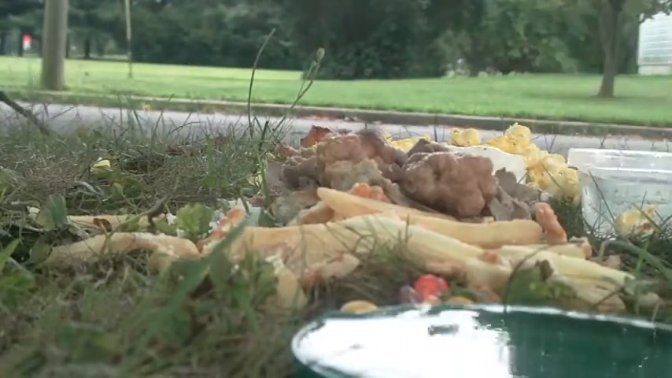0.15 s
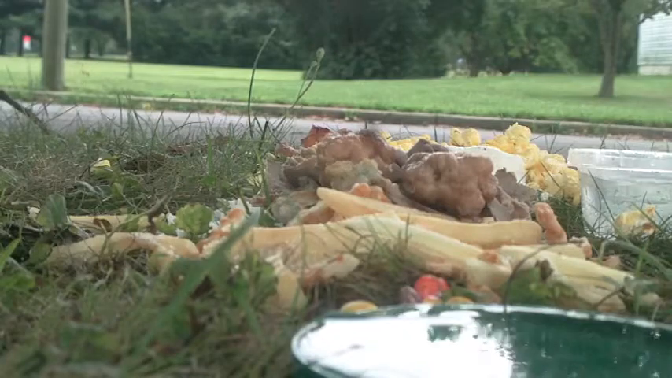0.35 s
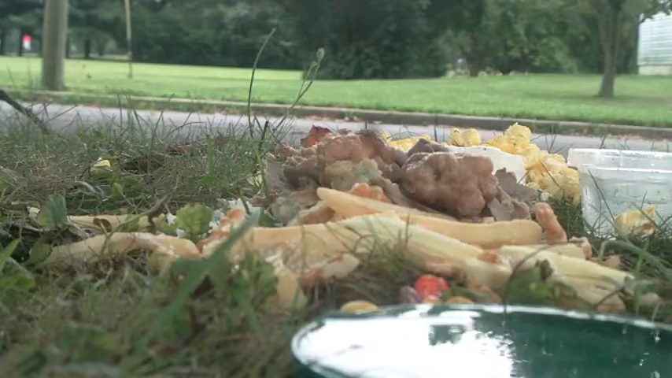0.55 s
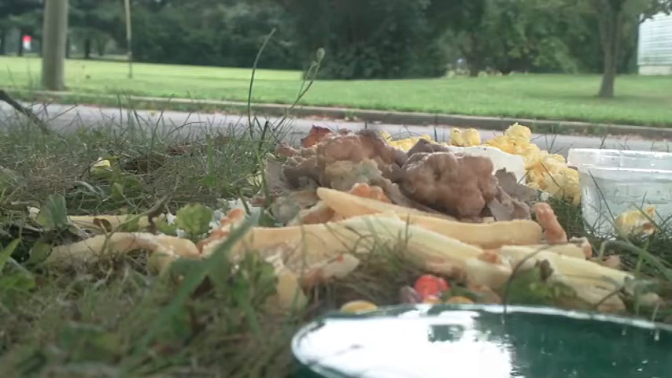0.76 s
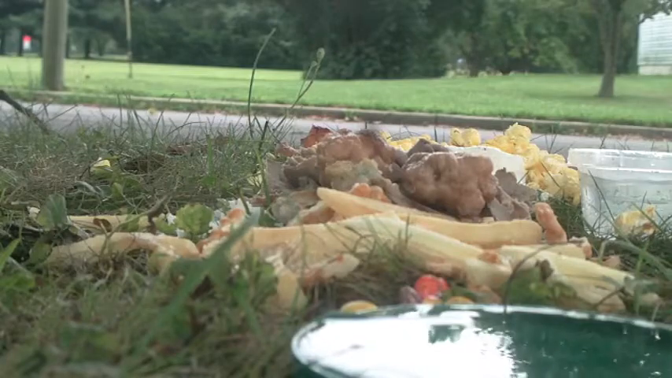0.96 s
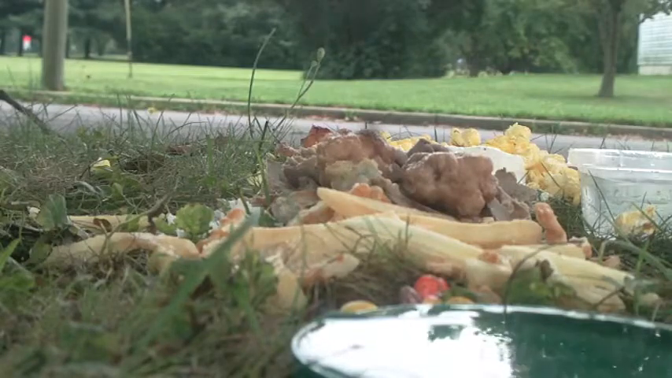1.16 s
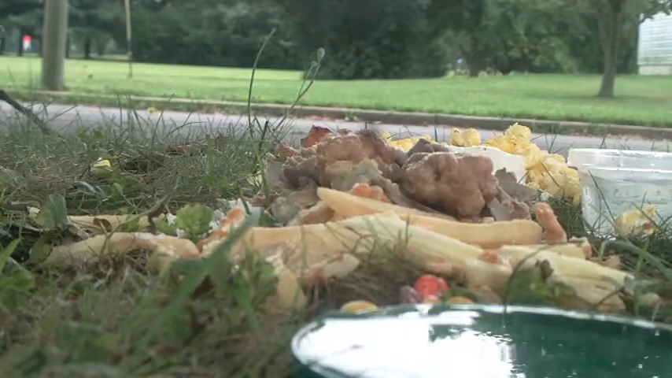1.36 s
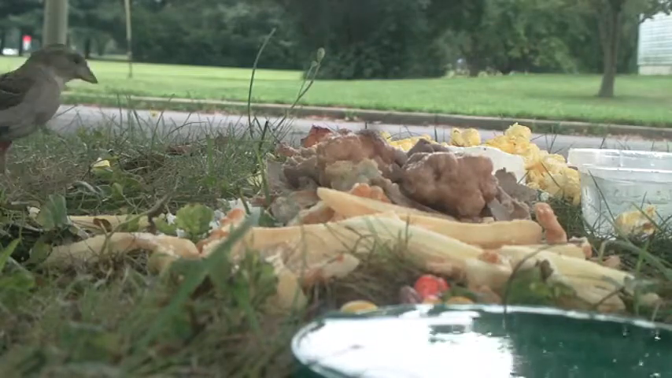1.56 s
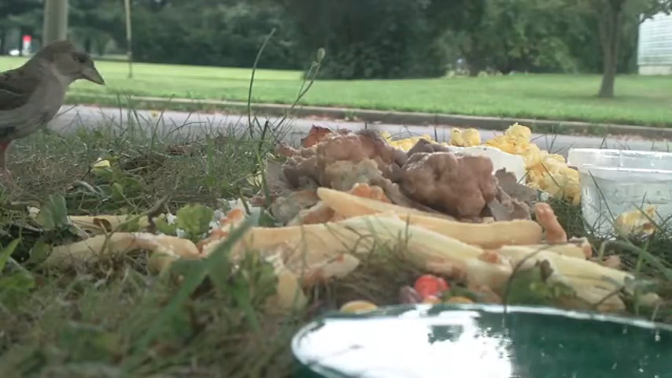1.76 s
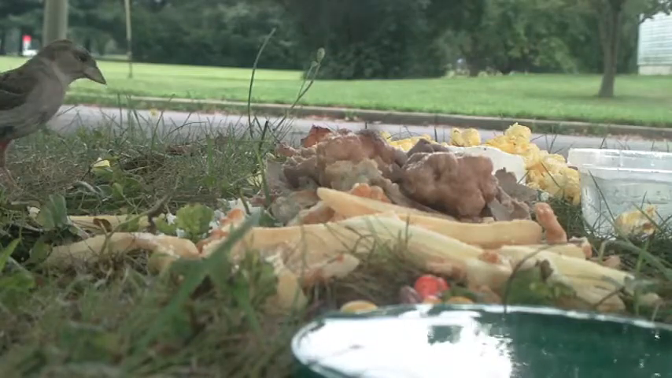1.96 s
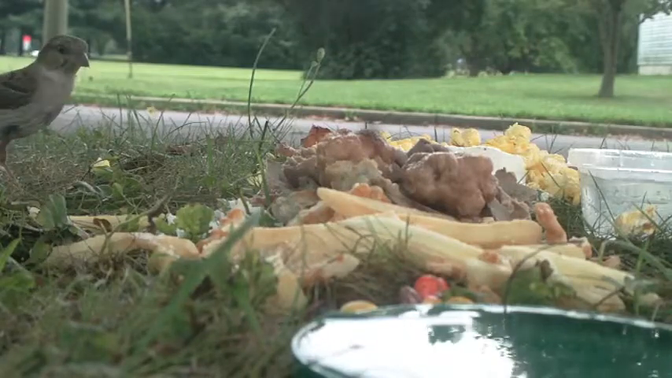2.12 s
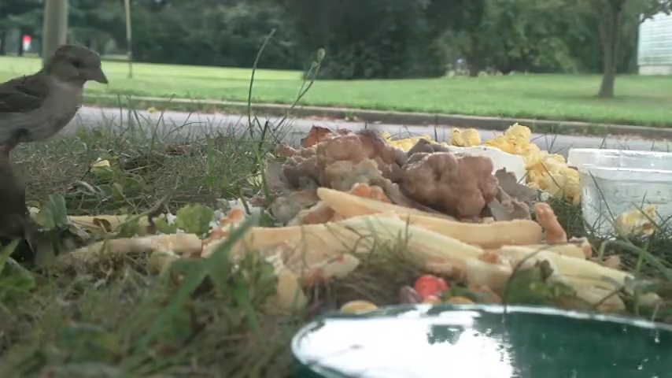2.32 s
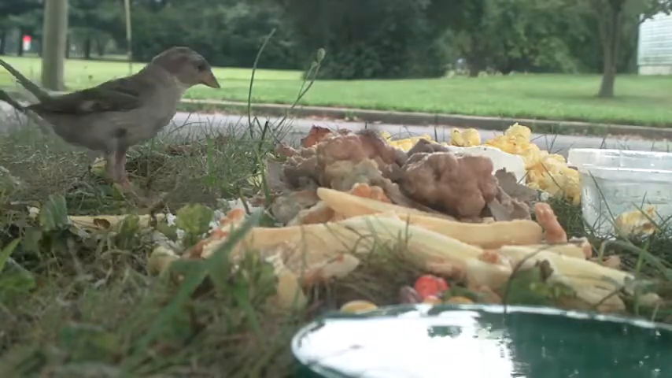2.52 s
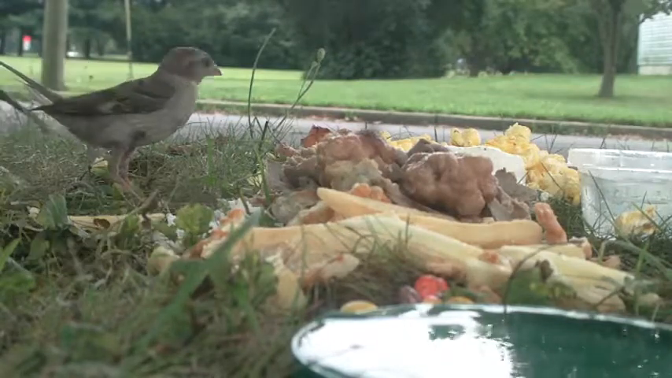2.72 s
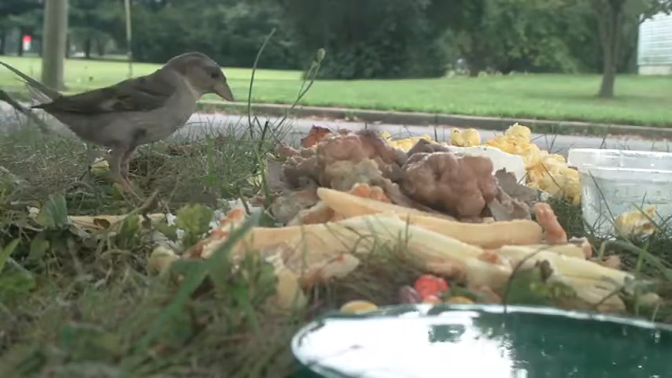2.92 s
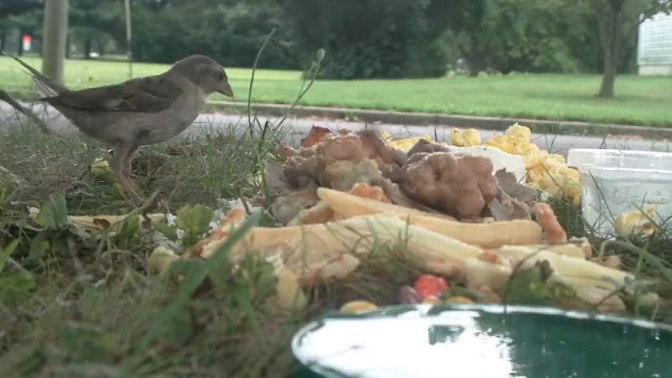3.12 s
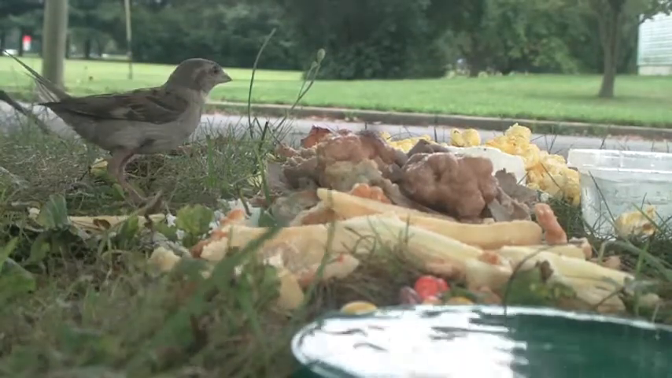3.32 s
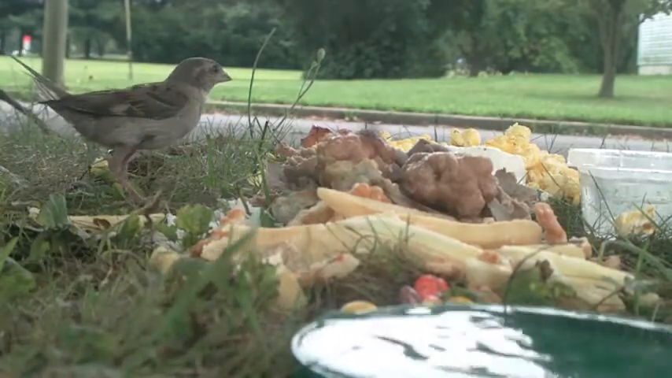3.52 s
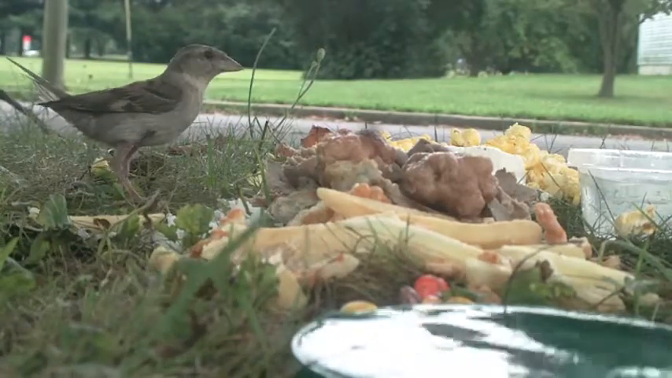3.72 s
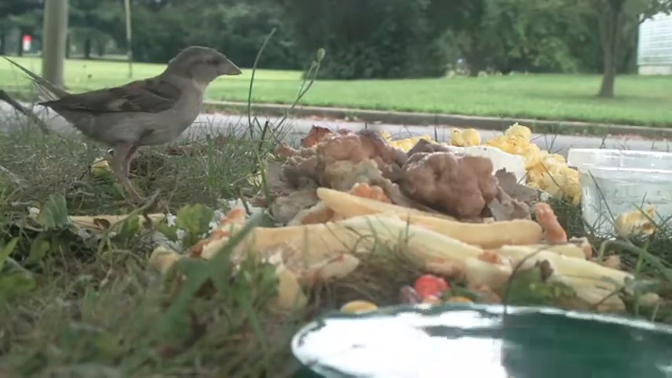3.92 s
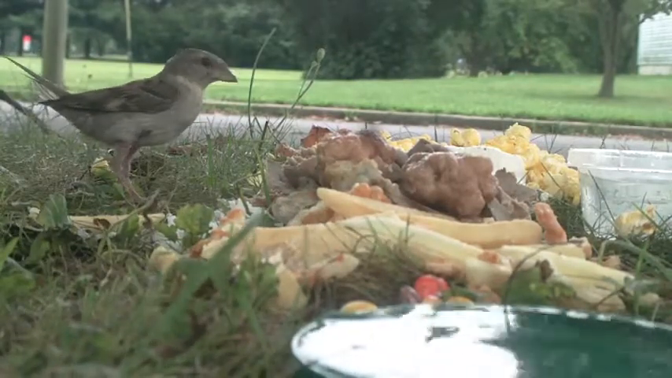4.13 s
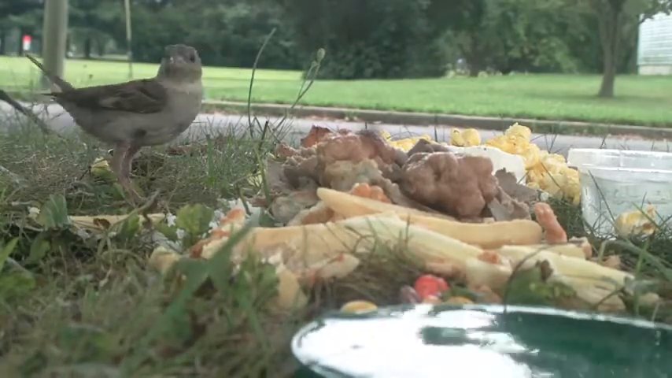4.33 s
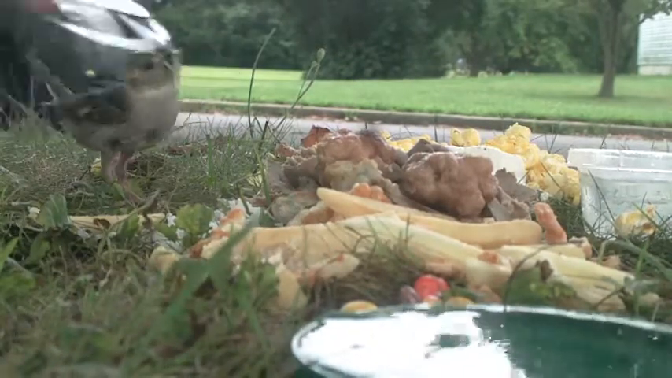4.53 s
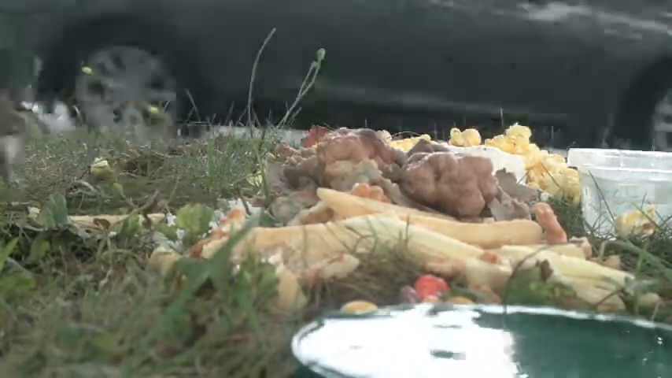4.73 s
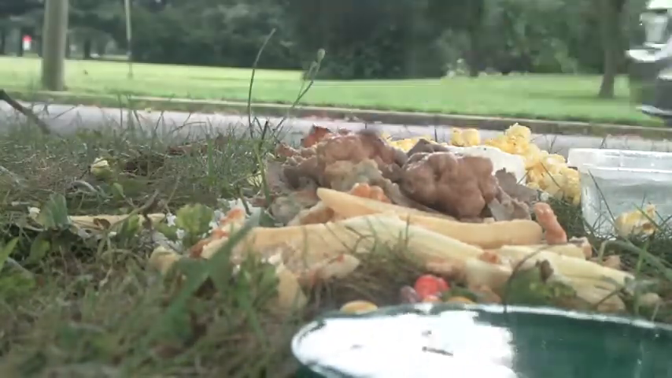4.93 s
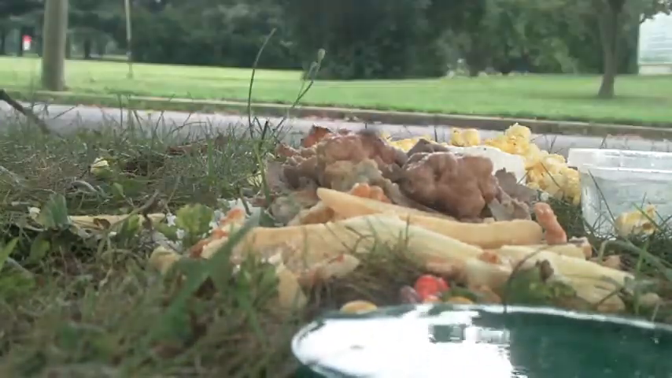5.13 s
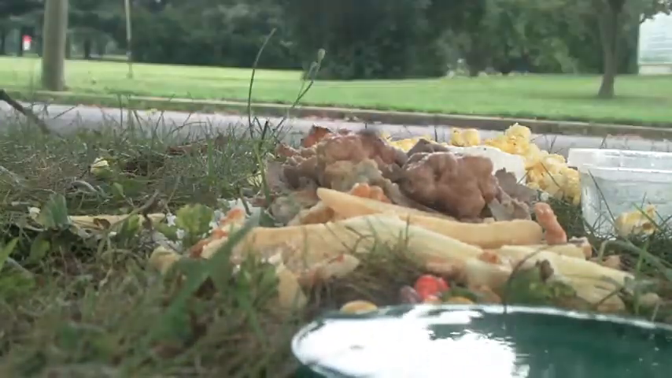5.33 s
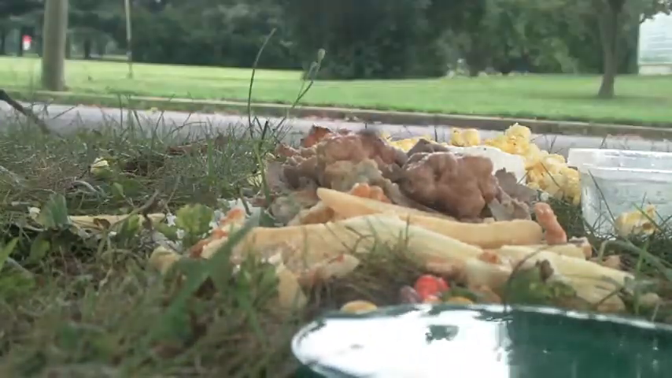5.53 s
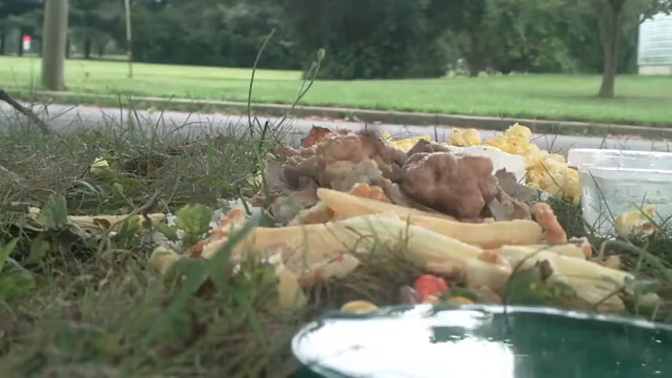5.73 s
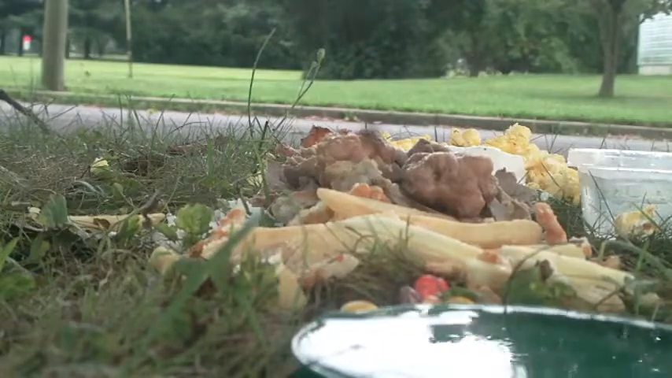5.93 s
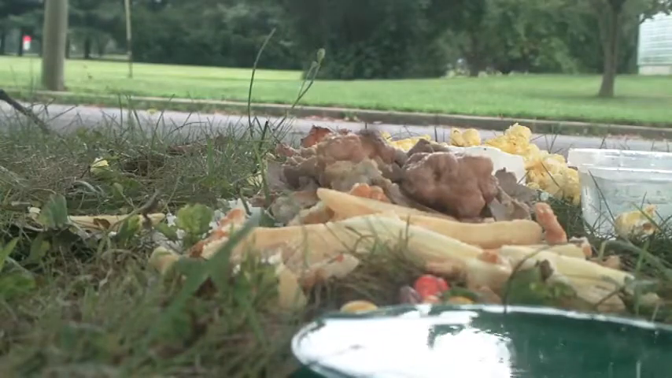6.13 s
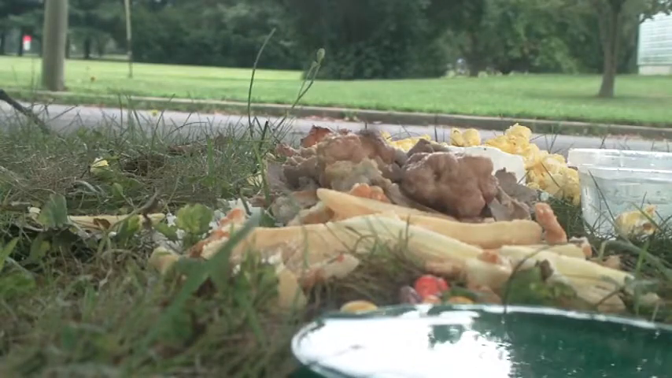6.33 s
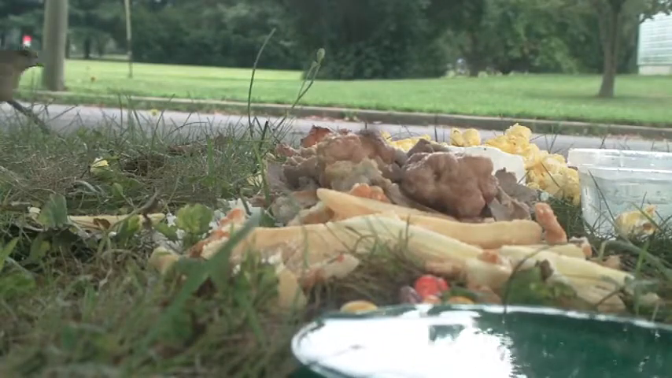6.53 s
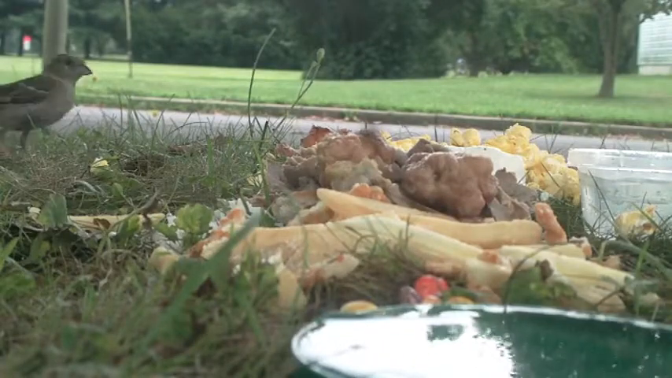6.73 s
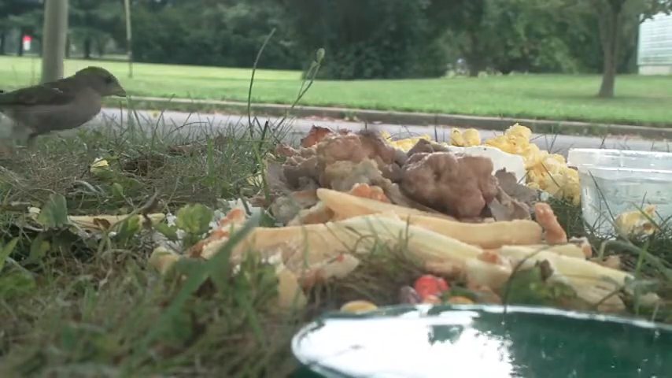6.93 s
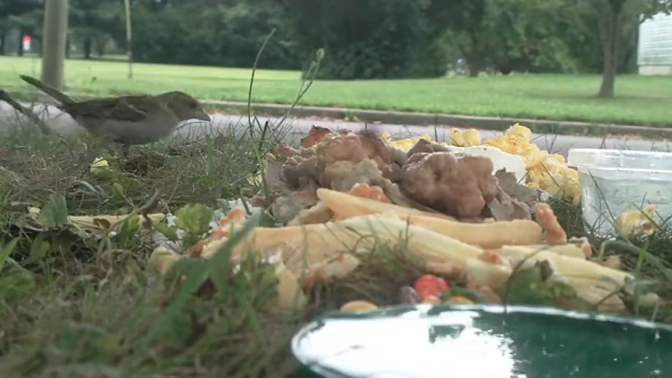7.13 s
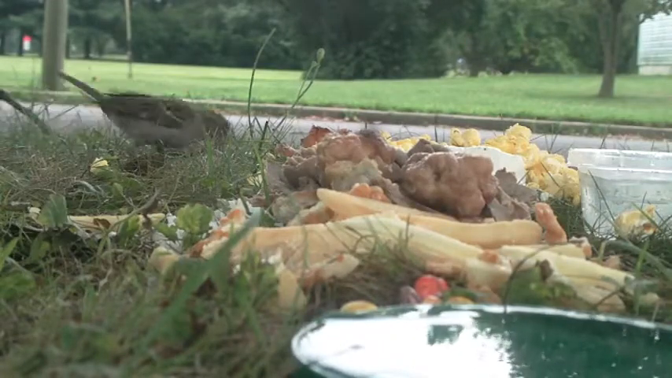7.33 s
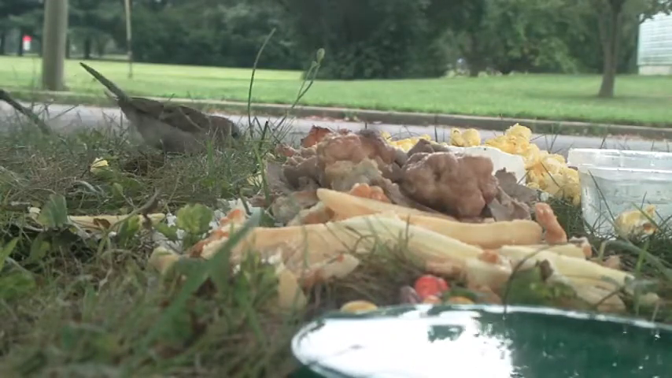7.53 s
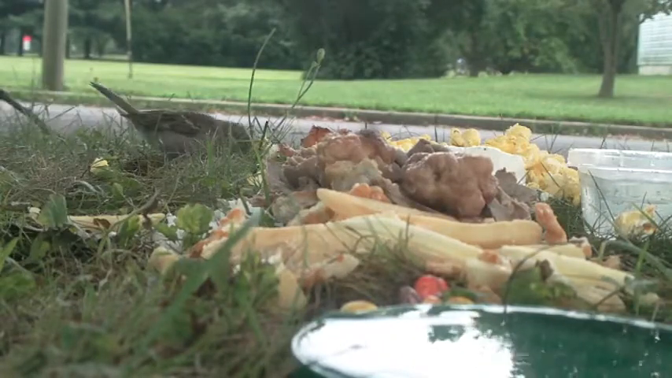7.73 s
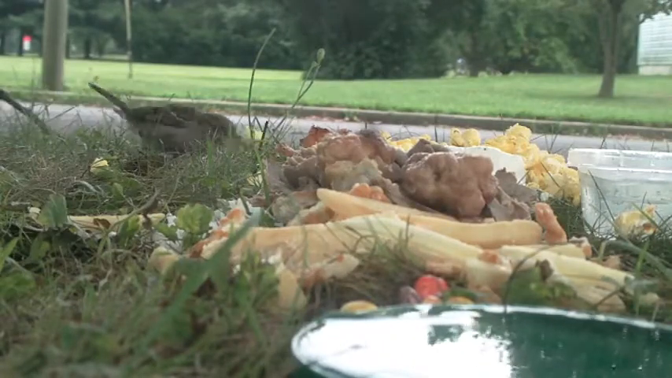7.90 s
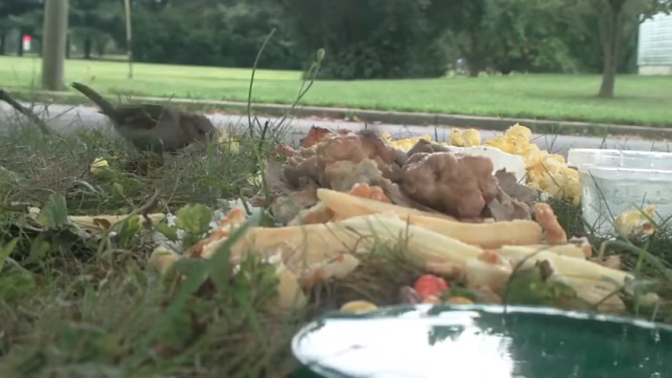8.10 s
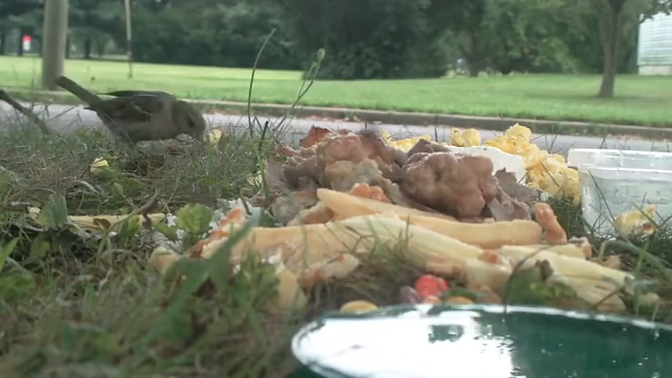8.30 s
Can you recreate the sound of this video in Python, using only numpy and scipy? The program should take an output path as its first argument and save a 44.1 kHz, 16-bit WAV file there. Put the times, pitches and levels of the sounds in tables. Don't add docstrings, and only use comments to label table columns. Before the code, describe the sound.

Distant town rumble, heavy wind buffeting, and a close car pass with tyre roar and wheel thuds, then abruptly quieter as another vehicle approaches.

```python
import sys
import numpy as np
from scipy import signal
from scipy.fft import rfft, irfft, next_fast_len
from scipy.io import wavfile
from scipy.ndimage import uniform_filter1d, map_coordinates

SR = 44100
rng = np.random.default_rng(int(sys.argv[2]) if len(sys.argv) > 2 else 0)


def volts(x):
    e = np.asarray(x, float) / 20
    return 10 ** e


def generate_wav(sig):
    pcm = np.round(np.clip(np.atleast_2d(sig).T, -1, 1) * 32767).astype(np.int16)
    wavfile.write(sys.argv[1], SR, pcm)


N = 368676
T = np.arange(N) / SR

SPLIT_HZ = [380, 1400, 7800]
# frequency in Hz, level in dB per Hz.
NEAR_TYRES = [(44, -23), (75, 1), (152, -6), (254, -1.5), (310, -7), (378, -10.5), (505, -10), (616, -14.5),
              (769, -13), (1030, -12.5), (2090, -31.5), (6900, -47), (7890, -41), (8620, -45.5),
              (15000, -51)]
# frequency in Hz, level in dB per Hz.
FAR_TYRES = [(44, 1.5), (75, 9.5), (140, 1.5), (190, 1), (222, -4), (284, -3), (331, -10.5), (378, -11),
             (859, -15.5), (939, -14.5), (1750, -14), (3630, -27.5), (6900, -35.5), (7890, -28),
             (15000, -42)]
# frequency in Hz, likeness from -1 to 1.
TYRES_ALIKE = [(60, 1), (130, 0.99), (290, 1), (640, 0.97), (1410, 0.94), (3100, 0.79), (6820, 0.49),
               (15000, -0.48)]
# level alongside in dB, gain along the road in dB, gain behind the
# car in dB, loss over grass in dB per metre, level of other traffic in dB.
RANGES = [
    (-19, -3.5, -1.5, 0.2, -37),
    (-21, -2.5, -0.5, 0.2, -54),
    (-32.5, 7, 0, 0, -60.5),
    (-42.5, -1.5, 3.5, -0.26, -62),
]
NEXT_CAR_DB = [4, 3.5, -2, -6]
# frequency in Hz, level in dB per Hz.
GROUND = [(15, -20), (28, -7), (42, 10), (55, -2), (75, -39.5)]
# time in seconds, frequency in Hz.
FIRING = [
    (4.5, 60.6),
    (4.68, 62.5),
    (4.95, 68.15),
    (5.62, 71.64),
    (6.06, 72.3),
    (6.37, 70.3),
]
# time in seconds, length in seconds, rise in dB.
LURCH = (4.36, 0.049, 24)
# start in seconds, frequency in Hz, level in dB.
IDLING = (5.62, 56.2, -32)
# time in seconds, length in seconds, rise in dB.
JOLTS = [
    (4.68, .04, 7),
    (4.79, .06, 10),
    (4.88, .03, 7.5),
    (5.054, .022, 22),
    (5.19, .03, 11),
    (5.35, .03, 13),
]
# time in seconds, frequency in Hz.
TREAD = [
    (3.85, 1128),
    (4.6, 1042),
    (5.9, 1040),
]
# time in seconds, length in seconds, rise in dB.
TREAD_ONSET = (3.92, 0.11, 5.7)
# time in seconds, slap level in dB, thud level in dB.
BUMPS = [
    (3.994, -10, -37),
    (4.333, -7, -15),
    (4.422, -5.5, -18),
    (4.488, -5, -6.5),
    (4.575, -11, -17),
    (4.705, 3, -31),
    (5.039, -7, -9.5),
    (5.733, -11, -16.5),
    (5.883, -10, -16),
    (6.221, -11.5, -36),
]
# time in seconds, strength in dB.
GUST = [
    (3.12, -42),
    (3.22, -18.5),
    (3.36, -6.5),
    (3.43, -0.5),
    (3.63, 0),
    (3.7, -6),
    (3.75, -10),
    (3.9, -16.5),
]
# frequency in Hz, level in dB per Hz.
HEAVE = [(12, -24), (25, 7), (40, 7.5), (70, 2), (120, -3), (250, -51)]
# frequency in Hz, level in dB per Hz.
FLUTTER = [(35, -36), (70, -2), (110, 6), (180, -3), (280, -4.5), (450, -15), (800, -31), (1600, -58)]
# frequency in Hz, level in dB per Hz.
WHISTLE = [(1500, -11), (3000, 5.5), (7000, -2), (10000, -8.5), (14000, 1), (16000, -13)]
# time in seconds, peak in dB, frequency in Hz.
THUMPS = [
    (3.256, -15, 46),
    (3.287, -7.5, 44.6),
    (3.346, -1, 42),
    (3.402, -1, 48),
    (3.464, -4, 34.7),
    (3.522, -6, 31.4),
    (3.581, -5.5, 50),
    (3.638, -10, 35.7),
    (3.669, -15, 38),
]
# time in seconds, length in seconds, rise in dB, left over right in dB.
FLAPS = [
    (3.432, 0.031, 22, 2),
    (3.49, 0.013, 9, -9),
    (3.53, .018, 17, 3.5),
    (3.588, 0.024, 18.5, -1.5),
    (3.624, 0.02, 12.5, 11),
]
# time in seconds, peak in dB, left over right in dB.
SPITS = [(3.2276, -40, 0.5), (3.265, -41, 4), (3.3084, -30.5, 0.5), (3.3487, -39, 3), (3.3694, -29, -3),
         (3.4014, -36, 1.0), (3.406, -22, -4), (3.4241, -30, 4), (3.4524, -37, -4.0), (3.4604, -23, 1),
         (3.481, -20.5, 3), (3.5104, -29, -1), (3.5204, -21.5, 2), (3.5464, -29, -2.5), (3.578, -20, -2),
         (3.6351, -30, -2), (3.7354, -33, -0.5), (3.7984, -36, -0.5)]
# time in seconds, peak in dB, left over right in dB.
TICKS = [
    (.6245, -38, -5),
    (.64, -39, 0),
    (.76, -46, 0),
    (1.3903, -34, 3),
    (2.5504, -46.5, 2),
    (2.5875, -36, 3),
    (3.188, -40, 0),
    (7.8835, -37, -1.5),
]
# time in seconds, peak in dB.
LENS_STEPS = [(0.2493, -60), (0.3701, -65.5), (0.5771, -56), (0.8734, -66), (1.2231, -63), (1.4794, -69),
              (1.6282, -61), (1.9754, -58.5), (2.3291, -65), (2.8294, -65), (7.3317, -66), (7.5423, -62),
              (7.7732, -62), (8.0237, -66), (8.2781, -57.5)]
# time in seconds, length in seconds, frequency in Hz, width in Hz, level in dB.
BIRDS = [
    (0.103, 0.15, 5310, 502, -59.5),
    (.55, .14, 6390, 300, -73),
    (0.895, 0.27, 6950, 700, -56.5),
    (1.7, .12, 6410, 300, -62),
    (1.962, 0.3, 6800, 600, -58),
]
# start in seconds, length in seconds, first Hz, last Hz, level in dB.
CHIRPS = [
    (1.198, 0.067, 2420, 2370, -46),
    (1.945, .055, 4500, 4100, -56),
]
# frequency in Hz, level in dB per Hz.
TOWN = [(13, -31), (22, 8.5), (53, 4.5), (107, -2), (153, -19), (201, -6), (328, -17.5), (615, -25),
        (1690, -36), (2840, -34), (6800, -32.5), (7790, -44), (8450, -40), (9430, -39), (15000, -50)]
# frequency in Hz, likeness from -1 to 1.
TOWN_ALIKE = [(60, 0.73), (130, 0.64), (290, 0.78), (640, -0.21), (1410, 1), (3100, 0.57), (6820, -0.084),
              (15000, -0.73)]
# start in seconds, end in seconds, frequency in Hz, first level in dB, last level in dB.
HUM = [
    (.3, 2.9, 192.7, -50.5, -44.5),
    (6.002, 8.36, 187.4, -43.5, -38.5),
]
# multiple of its frequency, level in dB, unsteadiness from 0 to 1.
HUM_ORDERS = [(0.248, 0, .04), (0.499, -3.5, 0.02), (0.641, -2.5, 0.02), (1, 0.5, 0), (1.8, -12, 0),
              (2, -11.5, 0), (2.31, -12.5, 0.02), (2.5, -9, 0.02)]
# frequency in Hz, width in Hz, level in dB.
NOTCH = (7880, 270, -19)

JUMP_S = 6.38
NEAREST_S, NEXT_NEAREST_S = 4.737, 10.91
SPEED_M_S = 11
KERB_M = 3.45
AXLE_M = 1.1
HEDGE_S, HEDGE_DB, HEDGE_CLEARS_S = 0.42, -3.5, 0.48
CLEAR_M, CLEAR_SHIFT_M = 15, 4.3
PORT_LAG = 2.33
FIRING_DB, FIRING_FALL = -19, 1.32
PIPE_S, PIPE_TURN_S, HIDDEN_DB = 4.64, 0.021, -19
CAVITY_HZ, CAVITY_DB, CAVITY_FALL = 257.1, -27, 2.3
TREAD_DB, TREAD_FALL, TREAD_BEHIND_DB = -37, 0.98, -2
GRIT_PER_S, GRIT_DB, GRIT_SCATTER_DB, GRIT_FALL = 45, -19, 4, 1.8
GRIT_HZ, GRIT_OCTAVES, GRIT_CYCLES = 520, .8, 5
HEAVE_DB, FLUTTER_DB, FLUTTER_SHARE = -12, -22, 1.1
THUMP_LAG_S = .003
WHISTLE_S, WHISTLE_DB = 3.36, -38.5
WHISTLE_RISE_DB_S, WHISTLE_FALL_DB_S = 55, 20
TOWN_DB = -36
TOP_HZ = 15080


def unit(x):
    return x / np.sqrt(np.mean(x ** 2) + 1e-20)


def along(points, hz):
    f, v = np.transpose(points)
    return np.interp(np.log(hz + 1), np.log(f + 1), v)


def curves(rows):
    s, *cols = np.transpose(rows)
    return [np.interp(T, s, c) for c in cols]


def within(start, end, fade):
    return np.clip(np.minimum(T - start, end - T) / fade + 1, 0, 1)


def swells(rows):
    return sum(np.outer(heights, np.exp(-((T - s) / length) ** 2)) for s, length, *heights in rows)


def wobble(rate):
    coarse = T[::64]
    knots = rng.standard_normal(int(N * 60 / SR) + 4)
    return np.interp(T, coarse, map_coordinates(knots, [coarse * min(rate, 60)]))


def filtered(x, response):
    m = next_fast_len(N + 8192)
    return irfft(rfft(x, m) * response(np.fft.rfftfreq(m, 1 / SR)), m)[..., :N]


def rush(spectrum, alike, patchy_db=0):
    pair = rng.standard_normal((2, N))
    if patchy_db:
        z = signal.stft(pair, nperseg=512)[2]
        field = uniform_filter1d(rng.standard_normal(z.shape[1:]), size=6, axis=0)
        field = uniform_filter1d(field, size=10, axis=1)
        pair = signal.istft(z * volts(patchy_db * unit(field)), nperseg=512)[1][:, :N]

    def response(hz):
        turn = np.arccos(np.clip(along(alike, hz), -1, 1)) / 2
        return volts(along(spectrum, hz)) * [np.cos(turn), np.sin(turn)]

    mid, side = filtered(pair, response)
    return unit(np.array([mid + side, mid - side]))


def even(x):
    return unit(x / np.sqrt(np.abs(uniform_filter1d(x * x, size=1400, axis=1)) + 0.14))


def tone(hz, unsteady, rate):
    strength = np.sqrt(2) * volts(10 * unsteady * wobble(rate))
    pitch = hz * (1 + unsteady * wobble(rate))
    return strength * np.sin(2 * np.pi * np.cumsum(pitch) / SR)


def add(into, s, piece):
    at = round(s * SR)
    into[:, at:at + piece.shape[-1]] += piece


def clicks(events, life, low_hz, trim_db, rise, order):
    out, t = np.zeros((2, N)), np.arange(SR // 30) / SR
    for s, db, pan_db in events:
        level_db = db + trim_db - 60 * t / life + pan_db * np.array([[.5], [-.5]])
        shape = volts(level_db) * (1 - np.exp(-t / rise))
        add(out, s, shape * rng.standard_normal((2, len(t))))
    return filtered(out, lambda hz: 1 / (1 + (low_hz / (hz + 1)) ** order))


def car():
    past = SPEED_M_S * (T - np.where(T < JUMP_S, NEAREST_S, NEXT_NEAREST_S))
    axle = np.hypot(np.maximum(np.abs(past) - AXLE_M, 0), KERB_M)
    hedge_db = HEDGE_DB * (1 - np.tanh((T - HEDGE_S) / HEDGE_CLEARS_S)) / 2
    return past, np.hypot(past, KERB_M), 20 * np.log10(KERB_M / axle) + hedge_db


def tyres():
    past, away, spread_db = car()
    near = 1 / (1 + ((past - CLEAR_SHIFT_M) / CLEAR_M) ** 4)
    side_db, horn_db, behind_db, grass_db, other_db = np.transpose(RANGES)[..., None]
    own_db = side_db + (T > JUMP_S) * np.c_[NEXT_CAR_DB] + spread_db
    own_db = own_db + horn_db * (past / away) ** 2 + behind_db * past / away
    own_db = own_db - grass_db * (away - KERB_M)
    gains = np.hypot(volts(other_db), volts(own_db))
    colours = []
    for spectrum in FAR_TYRES, NEAR_TYRES:
        roar = rush(spectrum[:-1], TYRES_ALIKE, patchy_db=0.91) * volts(0.12 * wobble(18))
        lows = [filtered(roar, lambda hz: 1 / (1 + (hz / edge) ** 6)) for edge in SPLIT_HZ]
        parts = np.diff([0 * roar] + lows + [roar], axis=0)
        colours.append(sum(gain * unit(part) for gain, part in zip(gains, parts)))
    out = np.cos(near * np.pi / 2) * colours[0] + np.sin(near * np.pi / 2) * colours[1]
    out[0] = map_coordinates(out[0], [np.arange(N) + PORT_LAG * past / away], order=4, mode="nearest")
    return out + near * gains[0] * volts(-11.5) * rush(GROUND, [(40, 0.75)])


def engines():
    past, away, spread_db = car()
    hidden = (1 - np.tanh((T - PIPE_S) / PIPE_TURN_S)) / 2
    firing_db = FIRING_DB + FIRING_FALL * spread_db + HIDDEN_DB * hidden + swells([LURCH])[0]
    out = np.zeros(N)
    for start, hz, db in (4.2, curves(FIRING)[0], firing_db), IDLING:
        note = tone(hz, 0.0071, 11) + volts(-7.5) * tone(2 * hz, 0.0197, 12)
        out += within(start, JUMP_S - .015, 0.01) * volts(db) * note
    cavity_db = CAVITY_DB + CAVITY_FALL * spread_db + swells(JOLTS)[0]
    out += (T < JUMP_S) * volts(cavity_db) * tone(CAVITY_HZ, 0.0699, 40)
    heard = within(TREAD[0][0], TREAD[-1][0], .1)
    tread_db = TREAD_DB + TREAD_FALL * spread_db + TREAD_BEHIND_DB * past / away + swells([TREAD_ONSET])[0]
    song = sum(tone(curves(TREAD)[0] * k, .025, 40) for k in (.97, 1.03))
    return out + heard * volts(tread_db) * song


def bumps():
    out, t = np.zeros((1, N)), np.arange(SR // 8) / SR

    def ring(pitches, scatter_db, life):
        return sum(volts(rng.normal(0, scatter_db) - 60 * t / life) * np.sin(2 * np.pi * hz * t) for hz in pitches)

    for s, slap_db, thud_db in BUMPS:
        slap = volts(slap_db - 9.5) * ring((676, 743, 874, 1040), 2.1, 0.034)
        thud = volts(thud_db - 6.5) * ring((165, 200, 250), 2.9, 0.2)
        add(out, s, (slap + thud) * (1 - np.exp(-t / 0.0011)))
    return out


def grit():
    when, size, pitch = rng.random((round(GRIT_PER_S * JUMP_S), 3)).T
    at, t = (when * (JUMP_S - .05) * SR).astype(int), np.arange(SR // 25) / SR
    hz = GRIT_HZ * 2 ** (GRIT_OCTAVES * (2 * pitch[:, None] - 1))
    db = GRIT_DB + GRIT_FALL * car()[2][at] - GRIT_SCATTER_DB * np.log(size)
    knocks = volts(db[:, None] - 60 * t * hz / GRIT_CYCLES) * np.sin(2 * np.pi * hz * t)
    return np.bincount((at[:, None] + np.arange(len(t))).ravel(), knocks.ravel(), N)


def gust():
    strength_db, = curves(GUST)
    heave = volts(HEAVE_DB + strength_db) * rush(HEAVE, [(30, 0.79), (80, 0.23)])
    thumps, t = np.zeros((2, N)), np.arange(-2000, 2000) / SR
    late = t + THUMP_LAG_S * np.array([[.5], [-.5]])
    for s, db, hz in THUMPS:
        pulse = np.sin(2 * np.pi * hz * late) * np.exp(-2.5 * (hz * late) ** 2)
        add(thumps, s + t[0], volts(db + 1.0) * pulse)
    flap_db, pan_db = swells(FLAPS)
    flutter_db = FLUTTER_DB + FLUTTER_SHARE * strength_db + flap_db + pan_db * [[.5], [-.5]]
    flutter = volts(flutter_db) * even(rush(FLUTTER, [(100, 0.059)]))
    fade_db = np.maximum(WHISTLE_RISE_DB_S * (WHISTLE_S - T), WHISTLE_FALL_DB_S * (T - WHISTLE_S))
    whistle = volts(WHISTLE_DB - fade_db + 2.9 * wobble(45)) * rush(WHISTLE, [(3000, 0.57), (9000, 0)])
    crackle = clicks(SPITS, life=.014, low_hz=2380, trim_db=8.5, rise=0.00099, order=3)
    return within(GUST[0][0], GUST[-1][0], 0.066) * (heave + whistle + flutter) + thumps + crackle


def camera():
    out = clicks(TICKS, life=.007, low_hz=12000, trim_db=9, rise=.0003, order=12)
    t = np.arange(round(0.018 * SR)) / SR
    whine = np.sin(2 * np.pi * 12720 * t) + volts(-3) * np.sin(2 * np.pi * 6360 * t)
    for s, db in LENS_STEPS:
        add(out, s, volts(db + 0.5) * whine * np.hanning(len(t)) ** .2)
    return out


def birds():
    columns = np.transpose(BIRDS)
    halfway = np.convolve(columns[0], [.5, .5], "valid")
    s, length, hz, width, db = columns[:, np.searchsorted(halfway, T)]
    echoes = sum(tone(hz + k * width, .025, 55) for k in (-.5, -.1, .4))
    out = volts(db - 1.5 - 29 * ((T - s) / length) ** 2) * np.array([echoes, np.roll(echoes, 700)])
    for s, length, first_hz, last_hz, db in CHIRPS:
        u = np.linspace(0, 1, round(length * SR))
        turns = np.cumsum(first_hz + (last_hz - first_hz) * u) / SR
        add(out, s, volts(db) * np.sin(np.pi * u) ** .5 * np.sin(2 * np.pi * turns))
    return out


def town():
    ends = [(s, f, level) for start, end, f, first, last in HUM for s, level in ((start, first), (end, last))]
    hz, db = curves(ends)
    load = within(*HUM[0][:2], 0.31)
    drone = sum(volts(level) * tone(k * hz, u, 14) * (load if k > 1.4 else 1) for k, level, u in HUM_ORDERS)
    heard = within(*HUM[0][:2], 0.28) + within(*HUM[1][:2], 0.25)
    roar = volts(TOWN_DB - 1.0 + 2.4 * wobble(2.99)) * rush(TOWN[:-1], TOWN_ALIKE, patchy_db=0.5)
    return roar + heard * volts(db) * drone


def scene():
    road = tyres() + engines() + bumps() + town()
    return road * volts([[.4], [-.4]]) + grit() + gust() + camera() + birds()


def roll_off(x):
    return signal.sosfilt(signal.butter(12, 15980, fs=SR, output="sos"), x)


def record(dry):
    clipped = dry / (1 + np.abs(dry / 2.1) ** 8) ** (1 / 8)
    hz0, width, db = NOTCH

    def response(hz):
        gap_db = db * np.exp(-((hz - hz0) / width) ** 4)
        return volts(gap_db - 48 * np.clip((hz - TOP_HZ) / 350, 0, 2))

    return roll_off(np.clip(filtered(clipped, response), -1, 1))


dry = scene()
out = record(dry)
generate_wav(out)
```